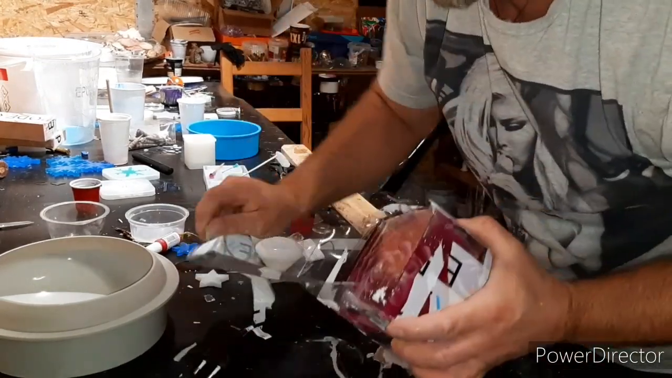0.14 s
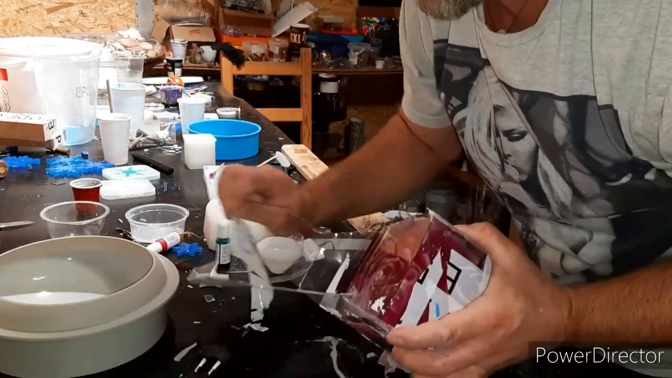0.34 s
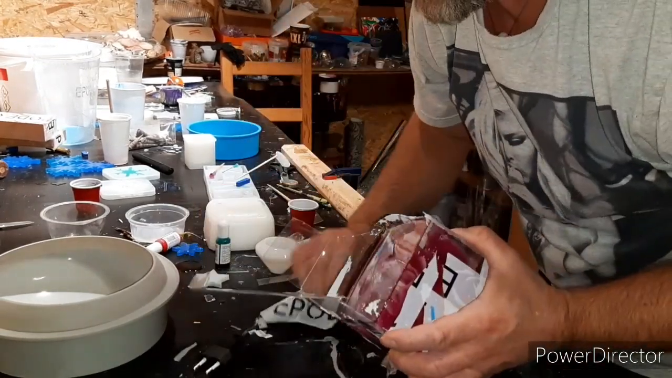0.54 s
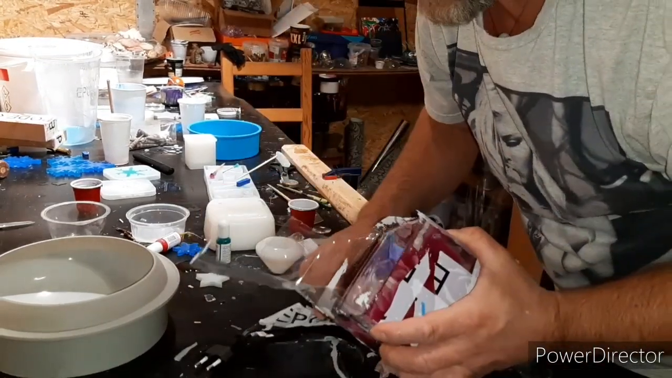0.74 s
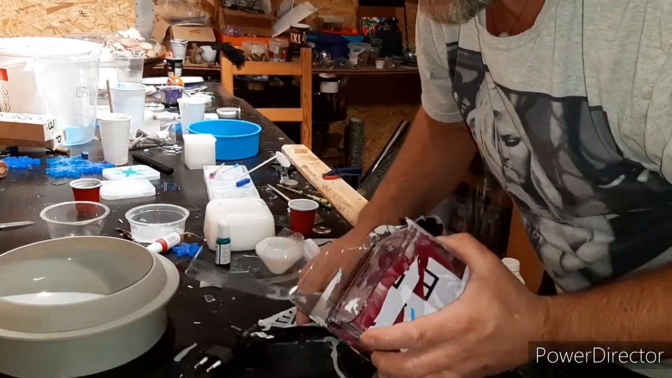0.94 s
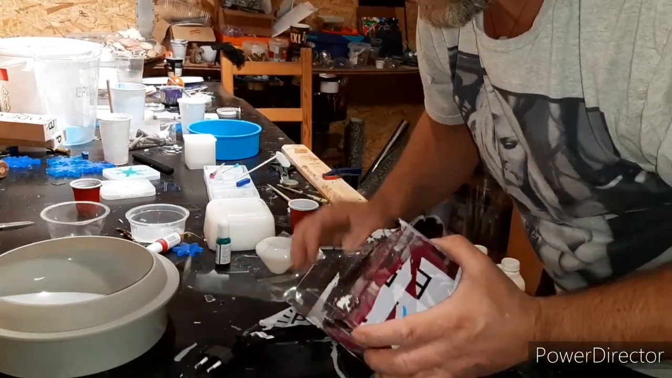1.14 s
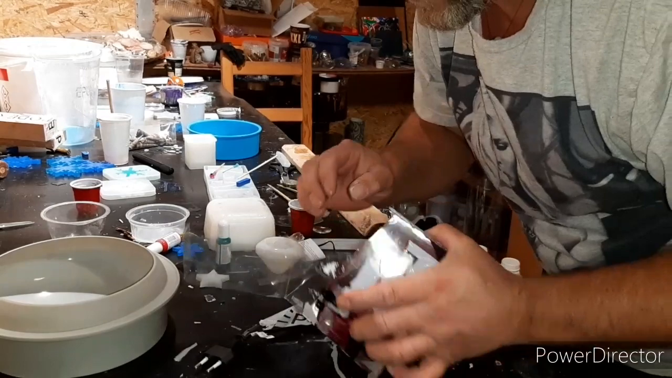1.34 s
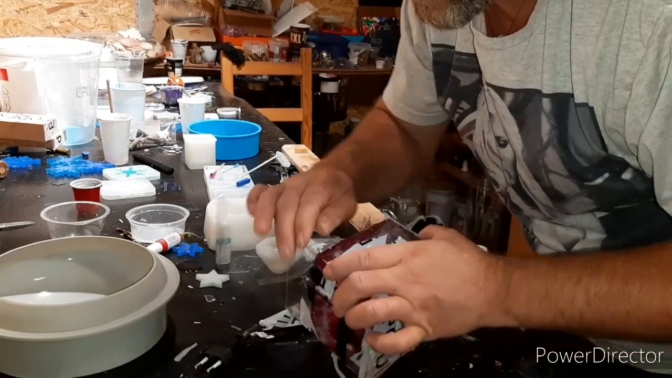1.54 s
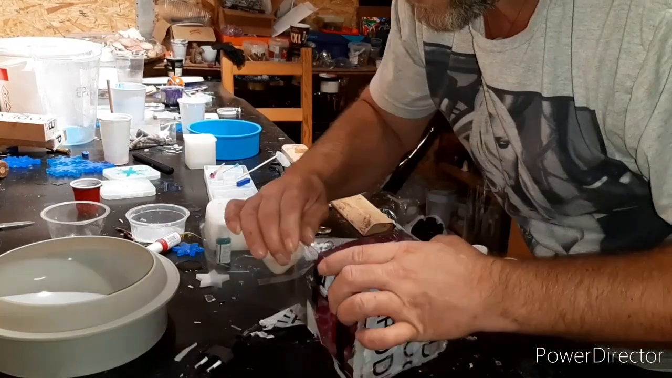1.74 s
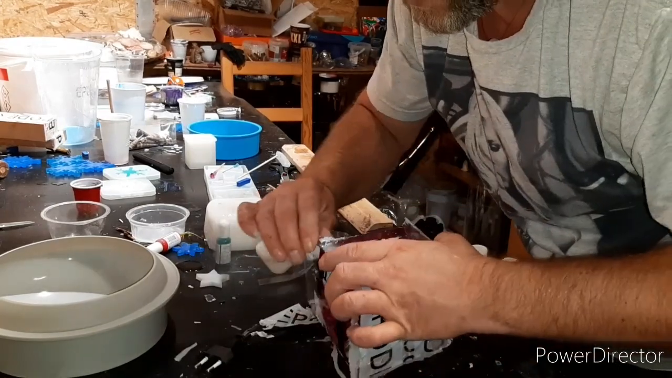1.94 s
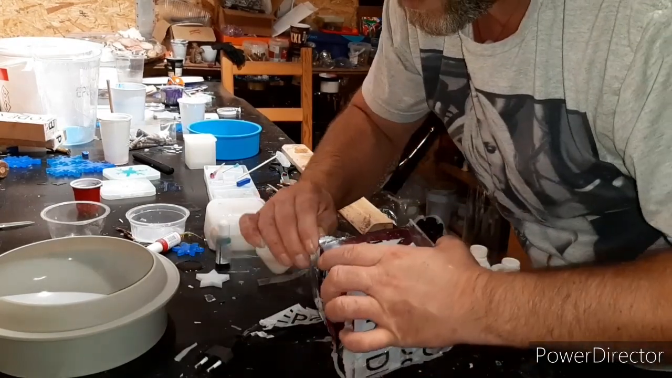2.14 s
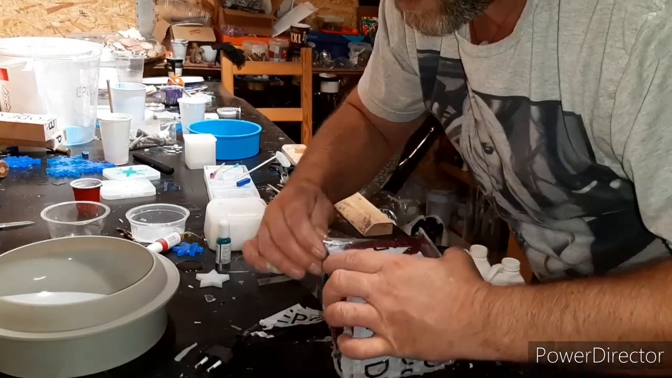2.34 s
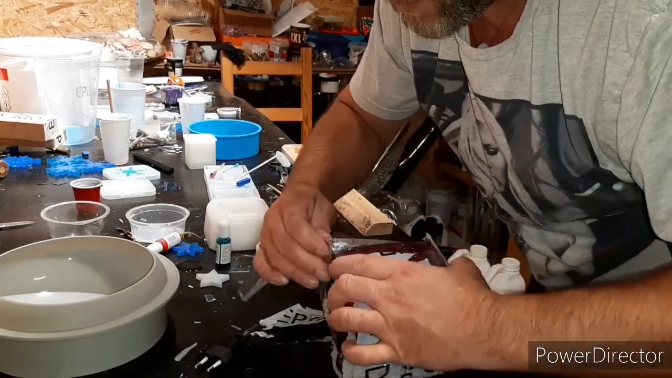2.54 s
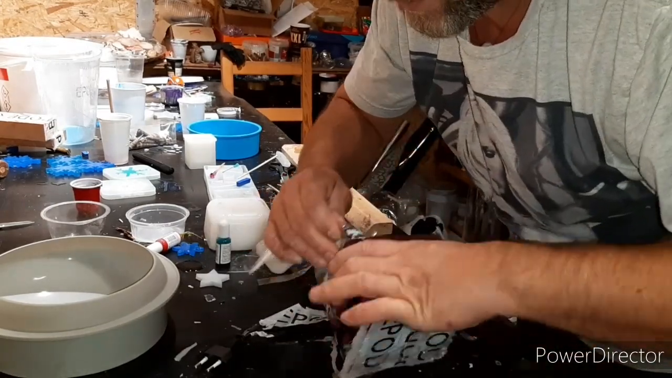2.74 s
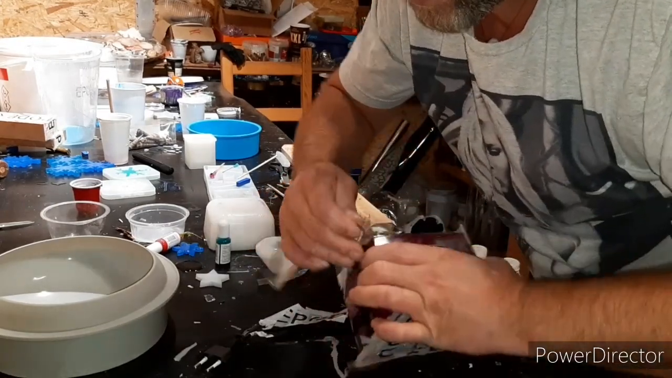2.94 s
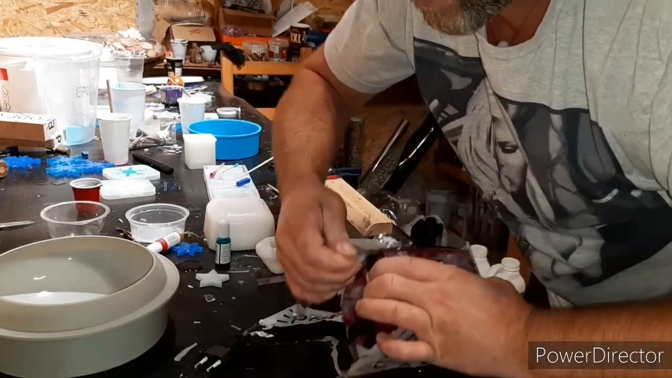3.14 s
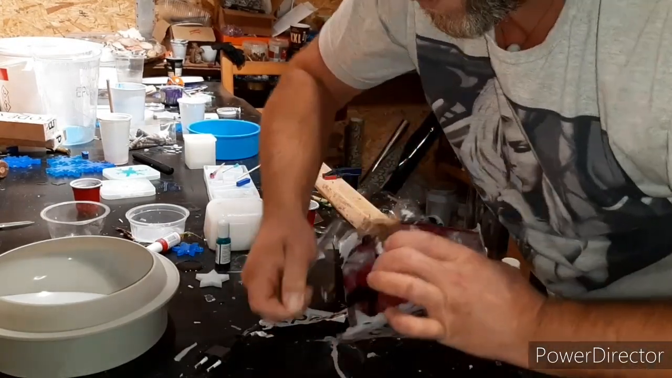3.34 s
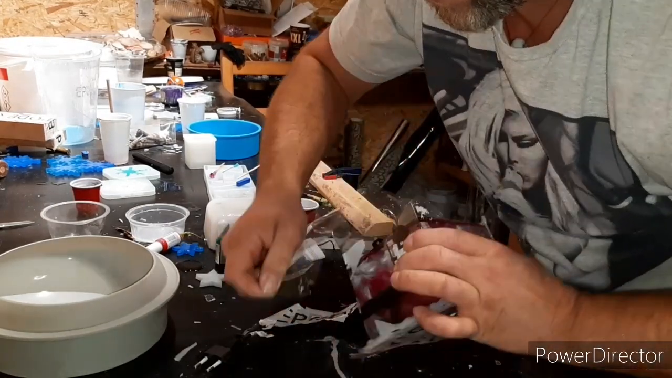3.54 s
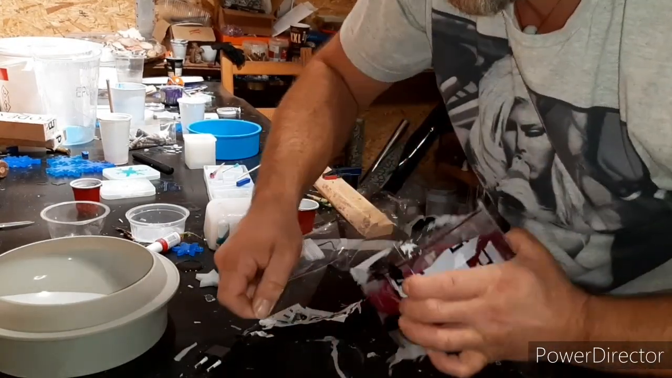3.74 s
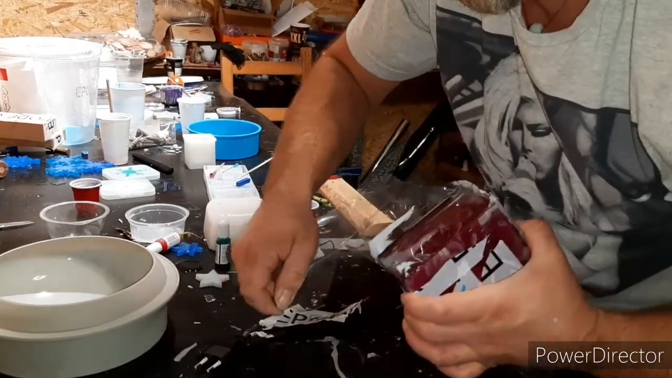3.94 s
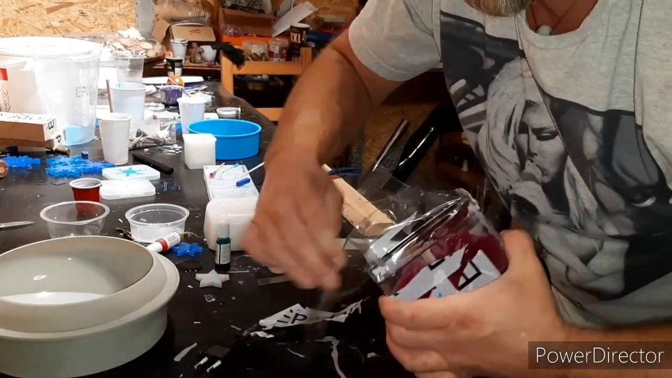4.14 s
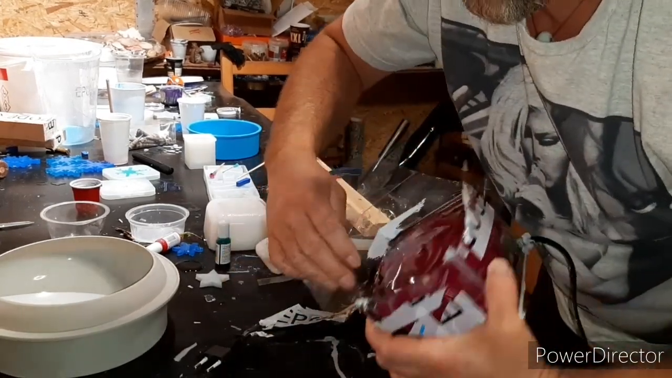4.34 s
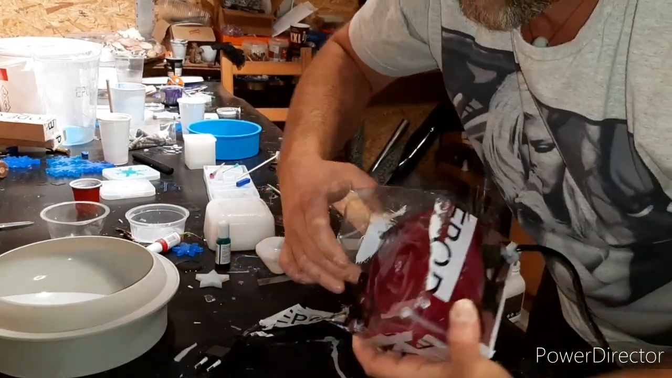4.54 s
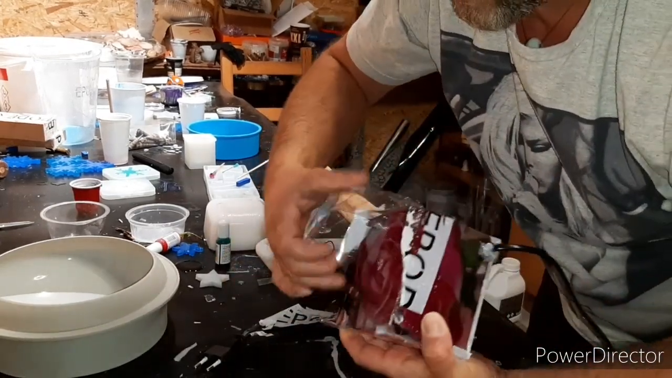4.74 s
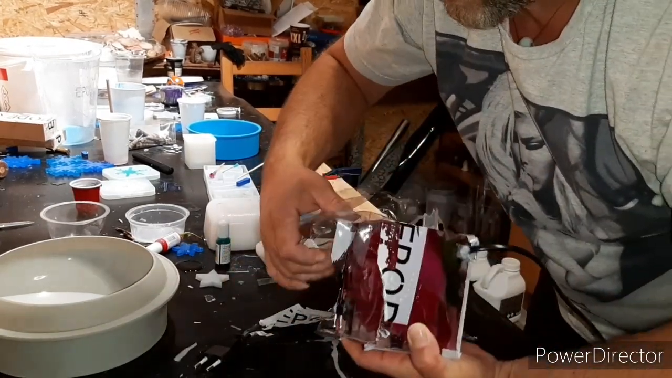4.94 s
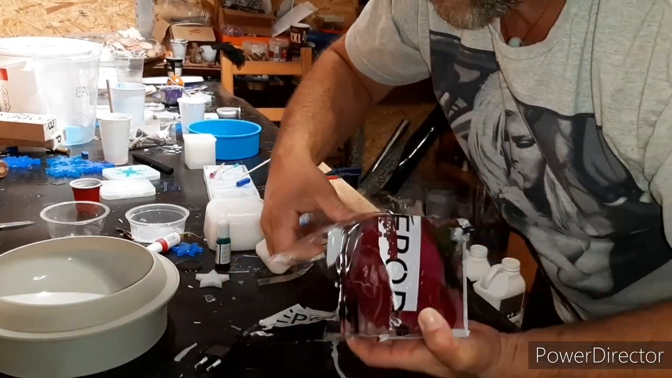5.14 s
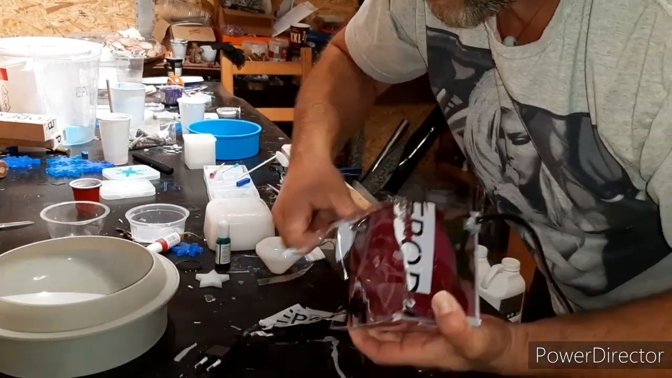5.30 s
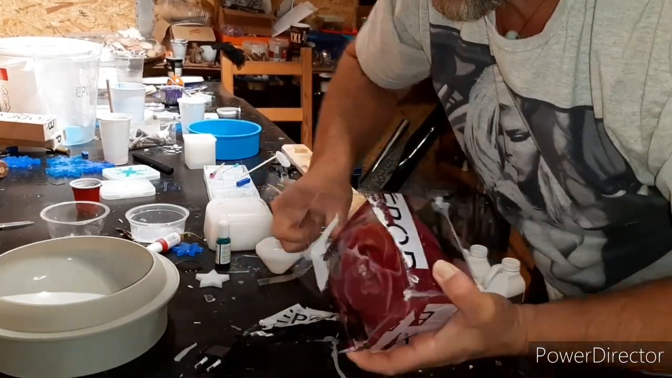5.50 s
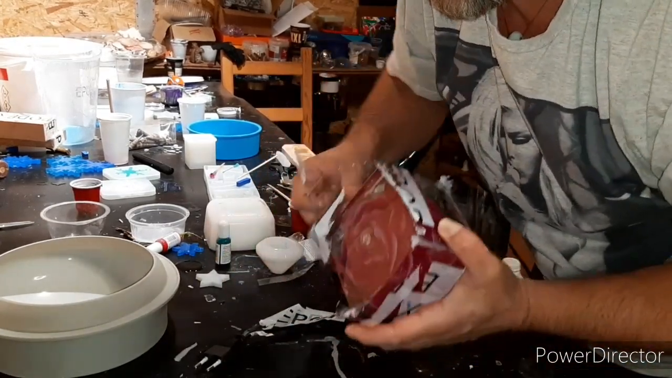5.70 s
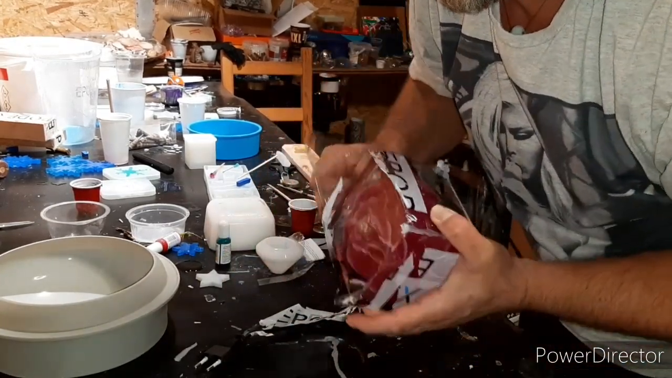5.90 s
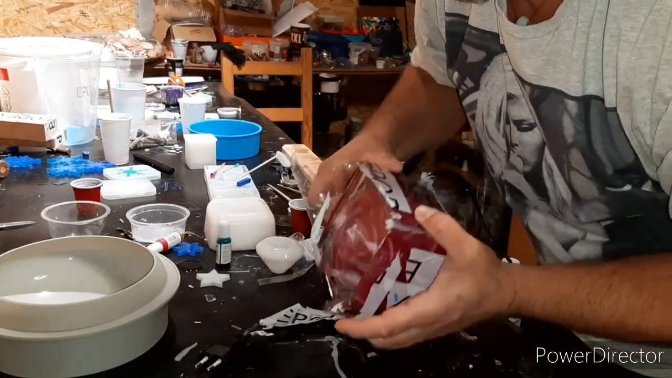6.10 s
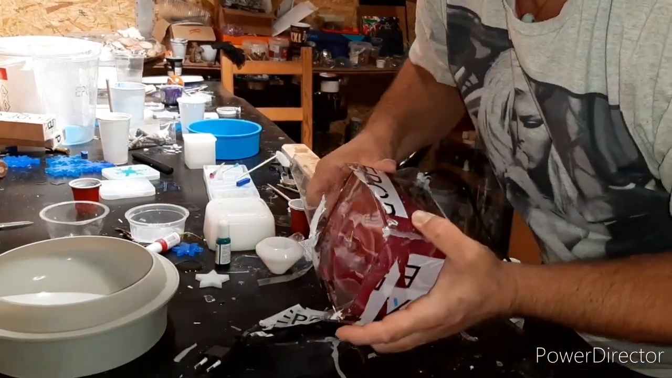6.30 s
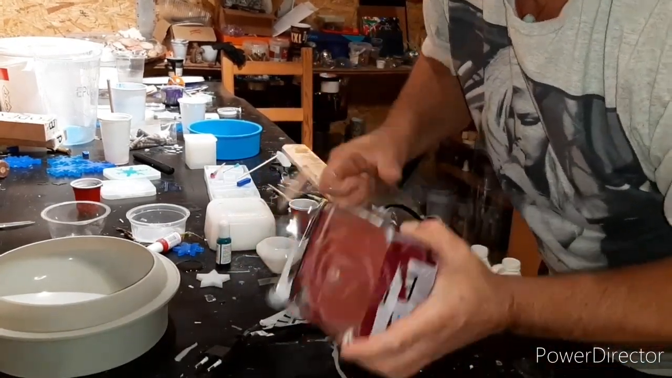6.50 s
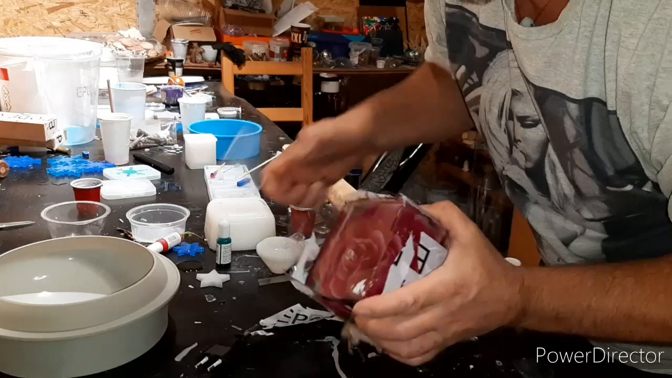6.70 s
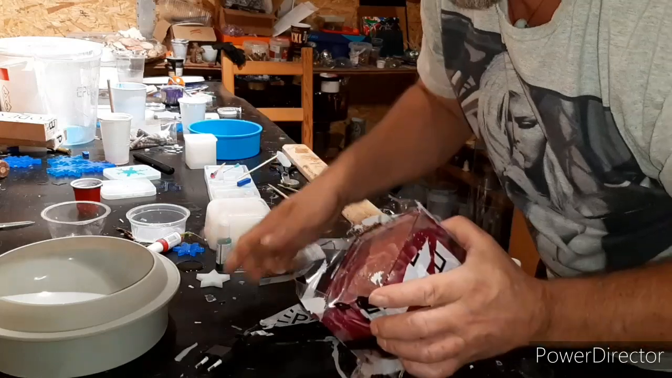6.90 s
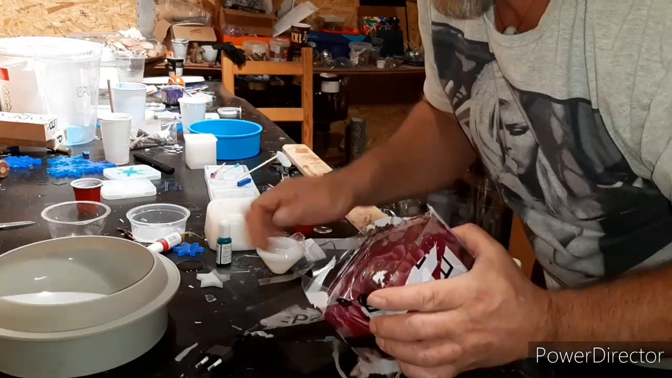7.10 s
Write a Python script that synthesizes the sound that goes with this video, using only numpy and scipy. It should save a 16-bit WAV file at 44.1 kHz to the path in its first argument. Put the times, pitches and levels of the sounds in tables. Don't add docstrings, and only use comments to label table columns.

```python
import sys
import numpy as np
from scipy import signal
from scipy.io import wavfile
from scipy.ndimage import uniform_filter1d

SR = 44100
rng = np.random.default_rng(int(sys.argv[2]) if len(sys.argv) > 2 else 0)


def gain_from_decibels(decibels):
    exponent = np.asarray(decibels, float) / 20
    return 10 ** exponent


def store_wav(level_fs):
    pcm = np.round(np.clip(np.atleast_2d(level_fs), -1, 1) * 32767)
    wavfile.write(sys.argv[1], SR, pcm.T.astype(np.int16))


N = 315753


def at_hz(points, hz, column=1):
    points = np.array(points)
    return np.interp(np.log(hz), np.log(points[:, 0]), points[:, column])


def in_time(points):
    times, levels = np.transpose(points)
    level_db = np.interp(np.arange(N) / SR, times, levels, left=-200, right=-200)
    return uniform_filter1d(gain_from_decibels(level_db), size=24)


RISE_SHARE = 0.28


def swells(rows, longest_s):
    t, gain = np.arange(0, N + 64, 64) / SR, 0
    for s, db, fall_s in rows:
        from_peak_s = np.where(t < s, (s - t) / RISE_SHARE, t - s)
        away = from_peak_s / np.clip(fall_s, .01, longest_s)
        gain = gain + gain_from_decibels(db - 20 * away ** 1.5)
    return np.interp(np.arange(N) / SR, t, gain)


def rms_one(x):
    return x / np.sqrt(np.mean(x ** 2) + 1e-20)


def add(out, s, sound):
    i = round(s * SR)
    out[i:i + len(sound)] += sound[:N - i]


def filtered(x, order, hz, kind):
    return signal.sosfilt(signal.butter(order, hz, kind, fs=SR, output="sos"), x)


# (frequency [Hz], likeness [0-1])
LIKENESS = [(60, 1), (250, 0.22), (640, 0.66), (1400, 0.044), (3000, 1), (7000, 0.041)]


def stereo_bands(size, gain, part=slice(None)):
    out, edges = 0, 30 * 2 ** np.arange(0, 9.6, .5)[part]
    white = rng.standard_normal((2, 2, size))
    for k, (low, high) in enumerate(zip(edges, edges[1:])):
        hz = np.sqrt(low * high)
        mid, side = filtered(white[k % 2], 2, [low, high], "band")
        alike = at_hz(LIKENESS, hz)
        pair = np.sqrt(1 + alike) * mid + np.sqrt(1 - alike) * side * [[1], [-1]]
        out = out + gain(hz) * pair
    return out


# (frequency [Hz], level [dB per Hz])
RUMBLE_COLOUR = [(30, -6), (60, -3.5), (120, -4.5), (240, -14)]


def low_rumble():
    noise = stereo_bands(N, lambda hz: gain_from_decibels(at_hz(RUMBLE_COLOUR, hz)), slice(0, 5))
    return gain_from_decibels(-90.5) * rms_one(noise)


# (time [s], level [dB])
HISS_LEVEL = [(0, -82), (.55, -81), (.7, -77), (3.6, -77), (3.72, -90), (3.8, -78), (6.75, -79), (6.9, -92),
              (7.09, -92), (7.12, -82), (7.16, -82)]
# (frequency [Hz], level [dB per Hz])
HISS_COLOUR = [(300, 0), (2000, -6), (4000, -4), (10000, -9), (14000, -11), (18000, -24)]


def hiss():
    noise = stereo_bands(N, lambda hz: gain_from_decibels(at_hz(HISS_COLOUR, hz)), slice(8, None))
    return in_time(HISS_LEVEL) * rms_one(noise)


# (frequency [Hz], decay t60 [s], level [dB])
ROOM = [(125, 0.072, -18), (378, 0.22, -13.5), (1000, 0.14, -11), (2350, 0.21, -14), (5800, 0.22, -12),
        (9100, .21, -15), (13000, .2, -16), (18000, .1, -28)]
PLACES, MOVE_S = 4, .11
EARLY_DB, EARLY_S = -1, 0.019


def workshop(x):
    t, out = np.arange(SR // 2) / SR, 0
    place = (np.arange(N) / (MOVE_S * SR)).astype(int) % PLACES
    onset = np.clip(t / .005 - .5, 0, 1)
    early = 1 + gain_from_decibels(EARLY_DB) * np.exp(-t / EARLY_S)
    for k in range(PLACES):
        tail = stereo_bands(len(t), lambda hz: gain_from_decibels(at_hz(ROOM, hz, column=2) - 60 * t / at_hz(ROOM, hz)))
        tail = tail * onset * early * gain_from_decibels(np.array([[-21], [-22]]))
        out = out + signal.oaconvolve((x * (place == k))[None], tail, axes=1)[:, :N]
    return out


# (left delay [s], left level [dB], right delay [s], right level [dB])
BENCH_ECHOES = [(.0007, -21.5, 0.001, -10.5), (.0019, -13, 0.002, -14)]


def near_echoes(direct):
    out = direct.copy()
    for left_s, left_db, right_s, right_db in BENCH_ECHOES:
        out[0] += gain_from_decibels(left_db) * np.roll(direct[0], round(left_s * SR))
        out[1] -= gain_from_decibels(right_db) * np.roll(direct[1], round(right_s * SR))
    return out


# (time [s], level [dB])
DRAG = [(0.0, -90.5), (1.39, -75), (2.07, -69.5), (2.81, -78), (3.03, -68.5), (3.33, -89), (3.61, -86.5),
        (3.81, -96), (4.23, -73.5), (4.69, -69.5), (5.24, -84), (5.46, -70.5), (5.7, -59.5), (5.9, -83),
        (6.14, -87), (6.62, -71), (6.9, -88.5), (7.16, -90.5)]
# (frequency [Hz], level [dB per Hz])
RUB_COLOUR = [(21, -47), (35, -43.5), (91, -14.5), (124, -3.5), (280, -7), (360, -42), (620, -120)]


def bench_rub():
    lumps = gain_from_decibels(1.5 * rms_one(uniform_filter1d(rng.standard_normal(N), size=900)))
    noise = stereo_bands(N, lambda hz: gain_from_decibels(at_hz(RUB_COLOUR, hz)), slice(0, 8))
    return in_time(DRAG) * rms_one(lumps * noise)


# (time [s], peak level [dB], frequency [Hz])
BUMPS = [(0.36, -67, 130), (0.457, -63, 130), (0.455, -50, 310), (0.369, -52, 380), (4.19, -46, 290),
         (3.56, -65, 160), (6.78, -52, 133), (7.121, -60.5, 430), (0.719, -50, 206), (1.083, -38, 130),
         (1.154, -33.5, 225), (1.156, -40, 114), (1.289, -56, 116), (1.625, -55, 86), (1.86, -48, 123),
         (2.156, -53, 120), (2.1, -42.5, 190), (2.42, -54, 200), (1.8, -35, 286), (1.62, -50, 240),
         (2.059, -30.5, 250), (2.064, -35, 125), (2.082, -37.5, 147), (2.17, -57, 120), (2.09, -42, 410),
         (2.4, -43, 360), (4.06, -73, 111), (6.84, -65.5, 130), (2.356, -51, 116), (2.479, -43.5, 160),
         (2.878, -40.5, 210), (3.044, -31, 214), (3.127, -47, 210), (4.181, -69, 248), (4.384, -30.5, 294),
         (4.831, -37, 245), (5.263, -47, 100.6), (5.478, -39, 210), (5.645, -41, 180), (5.72, -55, 150),
         (6.239, -44, 147), (6.548, -28.5, 253), (6.741, -34, 260)]
# (time [s], frequency [Hz], level [dB], decay t60 [s])
FLAPS = [
    (1.728, 414.4, -32, 0.15),
    (5.732, 203, -41, 0.36),
]


def bumps(cycles=11.0, rise_s=0.007):
    out, t = np.zeros(N), np.arange(SR // 2) / SR
    soft = 1 - np.exp(-t / rise_s)
    pushes = [(s, hz, db, cycles / hz) for s, db, hz in BUMPS]
    for s, hz, db, t60 in pushes + FLAPS:
        add(out, s, gain_from_decibels(db - 60 * t / t60) * soft * np.sin(2 * np.pi * hz * t))
    return filtered(out, 2, 70, "high")


# (time [s], level [dB], frequency [Hz])
PUFFS = [
    (3.349, -18.5, 118),
    (6.446, -15.5, 106.9),
]


def puffs(turns=1.1):
    out = np.zeros(N)
    for s, db, hz in PUFFS:
        phase = np.arange(round(turns * SR / hz)) * hz / SR
        swell = np.sin(np.pi * phase / turns)
        add(out, s, gain_from_decibels(db) * swell * np.cos(2 * np.pi * (phase - turns * 1.3)))
    return out


# (frequency [Hz], level [dB])
SHEET = [(250, -16.5), (400, -1), (650, 5), (1100, -3.5), (1800, 4), (3500, -2.5), (8000, -14),
         (15000, -5.5)]


def crackle(low_hz, high_hz, per_s, uneven_db, cycles, count=12):
    clump = gain_from_decibels(uneven_db * rms_one(uniform_filter1d(rng.standard_normal(N), size=180)))
    sizes = gain_from_decibels(uneven_db * np.minimum(rng.exponential(1, N), 4)) * rng.choice([-1, 1], N)
    clicks = sizes * (rng.random(N) < per_s * clump / SR)
    dealt, out = rng.integers(0, count, N), 0
    for k, hz in enumerate(np.geomspace(low_hz, high_hz, count)):
        r, w = gain_from_decibels(-60 * hz / (cycles * SR)), 2 * np.pi * hz / SR
        struck = clicks * (dealt == k) + 1e-18
        ringing = signal.lfilter([0, np.sin(w)], [1, -2 * r * np.cos(w), r * r], struck)
        out = out + gain_from_decibels(at_hz(SHEET, hz)) * np.sqrt(hz) * ringing
    return rms_one(out)


def split(x):
    return [rms_one(filtered(x, 8, 7700, kind)) for kind in ("low", "high")]


# (time of most stir [s], middle level [dB], edge over it [dB], 20 dB fall [s])
STIRS = [(.35, -72.5, 2.5, 0.43), (0.649, -69.5, 11.5, 0.11), (0.751, -89.5, 22.5, -0.19),
         (1.13, -70.5, 7.5, -0.08), (1.19, -63, 9, .06), (1.76, -62, 14, .1), (1.94, -57.5, -21.5, 0.32),
         (2.07, -62, -3, .07), (2.28, -62, -6, .06), (2.5, -59, 3, .2), (2.87, -56, -4, .15),
         (3.01, -50, -9, .14), (3.272, -56, -7.5, -0.34), (3.57, -54, 6, .07), (3.85, -75, 1, -0.7),
         (4.09, -59, 1.5, .15), (4.3, -53, 0.2, .1), (4.44, -51, -3, -0.06), (4.03, -55, 3, .08),
         (4.53, -60, 0, .12), (4.7, -58, 2, .1), (4.809, -43.5, -6.5, 0.24), (4.961, -74.5, 15.5, 0.38),
         (5.029, -60, -4.7, 0.04), (5.31, -34, -14, 0.0565), (5.621, -57, 12.5, 0.39),
         (5.68, -49.5, -2, 0.1), (6.11, -57, 7, .12), (6.18, -48, 5, 0.12), (6.41, -75, 8, 0.46),
         (6.611, -47, -17, 0.15), (6.72, -65.5, 18, 0.08), (7.15, -84.5, 28.5, 0.1)]


def rustle():
    middle = crackle(1000, 6600, per_s=6000, uneven_db=4.5, cycles=16.0)
    edge, top = split(crackle(3500, 13000, per_s=6000, uneven_db=4.5, cycles=16.0))
    bright = edge + gain_from_decibels(-8.5) * top
    middle_gain = swells([(s, db, fall_s) for s, db, _, fall_s in STIRS], longest_s=.2)
    bright_gain = swells([(s, db + edge_db, fall_s) for s, db, edge_db, fall_s in STIRS], longest_s=.2)
    return gain_from_decibels(-8) * (middle_gain * middle + bright_gain * bright)


# (time of most strain [s], level [dB], 20 dB fall [s])
SQUEEZES = [(.05, -100, 1), (.62, -83, 1), (1.5, -77, 0.1), (1.8, -64, 0.42), (1.97, -64, -2.03),
            (2.1, -86, 2.4), (2.28, -71, -1.44), (2.93, -64, 0.6), (2.47, -62.5, 0.34), (2.83, -64, -0.9),
            (3.02, -53.5, 0.1), (3.12, -60, -0.9), (3.2, -51, 0.35), (3.39, -63.5, 0.5), (4.215, -58, 0.16),
            (4.3, -54, 0), (4.52, -83, 0), (4.85, -70, 0.73), (5.35, -60.5, 2.7), (5.68, -63.5, 0.21),
            (6.16, -82, 0.5), (6.46, -44, 0.02), (6.7, -60.5, 0.18)]


def creak():
    return gain_from_decibels(-3) * swells(SQUEEZES, .5) * crackle(240, 1300, per_s=1200, uneven_db=3.8, cycles=11.0)


RIP_ATTACK_S, RIP_SAG_DB, RIP_RELEASE_DB_PER_S = 0.001, 7, 328.5


def rip_outline(start_s, length_s, db):
    full_s = start_s + RIP_ATTACK_S
    end_s, end_db = full_s + length_s, db - RIP_SAG_DB
    return [(start_s, db - 20), (full_s, db), (end_s, end_db),
            (end_s + .2, end_db - .2 * RIP_RELEASE_DB_PER_S)]


# (start [s], length [s], body level [dB], middle level [dB], edge level [dB], top level [dB])
RIPS = [(0.705, 0.11, -70, -61.5, -49, -53), (2.381, 0.12, -55, -71, -82, -90),
        (2.776, 0.036, -51.5, -58, -69.5, -73), (3.123, 0.048, -40, -56.5, -50.5, -58.5),
        (3.3498, 0.051, -38, -21, -20, -20.5), (5.7237, 0.0034, -63.5, -34.5, -22, -54.5),
        (1.711, 0.011, -65, -53, -41, -41), (4.275, 0.02, -52, -43.5, -48.5, -48.5),
        (5.252, .012, -38, -35, -43, -64), (5.489, 0.01, -43.5, -21, -25.5, -41),
        (5.645, 0.0078, -38.5, -32, -31.5, -43), (3.555, 0.019, -79, -60, -50, -44.5),
        (3.99, .02, -58, -45.5, -48.5, -80), (5.883, 0.0053, -63, -41.5, -45.5, -48),
        (6.154, .012, -65.5, -57, -60, -58), (2.054, 0.031, -52.5, -62, -67, -85),
        (4.643, 0.013, -62, -48, -49, -47), (6.243, 0.018, -49.5, -44, -45.5, -55),
        (1.096, 0.036, -64, -59, -55.5, -63), (6.165, .02, -51, -45.5, -43.5, -46.5),
        (6.4463, 0.049, -53, -30, -15.5, -18)]


def rips():
    body, middle, bright = [crackle(low, high, per_s=5000, uneven_db=3.5, cycles=12.0)
                            for low, high in [(260, 1000), (1000, 4500), (3500, 14000)]]
    out = np.zeros(N)
    for k, band in enumerate([body, middle, *split(bright)]):
        gain = sum(in_time(rip_outline(s, length_s, dbs[k])) for s, length_s, *dbs in RIPS)
        out += gain_from_decibels(-3) * gain * band
    return out


def scattered(x):
    for lag in (23, 41, 67):
        taps = np.r_[1, np.zeros(lag - 1), -.6]
        x = signal.lfilter(taps[::-1], taps, x)
    return x


# (time [s], peak level [dB], frequency [Hz])
SPIKES = [(3.3504, -5, 2990), (3.3678, -8, 3530), (3.3688, -12, 3550), (3.3711, -7, 2500),
          (3.379, -13, 2500), (3.3854, -10.5, 4000), (3.3887, -9, 3920), (3.3975, -14, 2210),
          (3.55, -30, 5030), (3.565, -38, 4090), (4.6118, -36.5, 6070), (4.8385, -20, 4950),
          (5.2625, -6, 3990), (5.4535, -28.5, 3020), (5.4891, -13, 6000), (5.4958, -4, 2240),
          (5.4988, -6, 2500), (5.5985, -32.5, 7270), (5.727, -12.5, 4450), (6.09, -36, 3500),
          (6.125, -43.5, 4500), (6.2175, -31.5, 7000), (5.7222, -13, 2300), (2.9135, -38, 5070),
          (6.4481, -12, 4550), (6.466, -5, 4170), (6.4752, -11, 4040), (6.4863, -9, 3000),
          (6.4902, -9.5, 3026), (6.4971, -9, 3500), (6.667, -36, 4060), (6.687, -31, 7050),
          (6.726, -49, 4000), (6.752, -53, 5500)]


def spikes(cycles=7.5):
    out, t = np.zeros(N), np.arange(200) / SR
    for k, (s, db, hz) in enumerate(SPIKES):
        pulse = gain_from_decibels(db - 60 * t * hz / cycles) * np.sin(2 * np.pi * hz * t)
        add(out, s, (-1) ** k * filtered(pulse, 3, [hz / 6, 1.8 * hz], "band"))
    return out


CRACK_S, FOLD_S, TICK_S = .0024, .0036, .0014

# (time [s], peak level at 3-7 kHz [dB], ring over it [dB], top over it [dB])
TICKS = [(0.156, -55.5, -10.5, -6), (0.303, -52.5, -11, 1), (0.3673, -50, -14, 2), (0.6354, -45, -16, 1),
         (0.689, -31.5, -35, 0), (0.7556, -33, -18, -4), (0.8077, -28.5, -17, 0), (0.921, -50, -40, 4),
         (1.076, -42, -12, -7), (1.6321, -42, -8, -10), (2.61, -58, -10, -22), (2.648, -50, -7, -26),
         (2.6946, -49, -30, -22), (3.028, -49, -8, -1), (3.5743, -28.5, -12, -2), (3.837, -36.5, -14, 2),
         (4.098, -56, -14, 8), (4.1139, -37, -2.5, -5), (4.219, -66, 0, -15), (4.435, -56, -10, -1),
         (5.0064, -44.5, -2, 0), (4.2526, -42, -5, -11), (4.4517, -47.5, -3, -11),
         (4.6132, -40.5, -5.5, -2), (5.5987, -23.5, -12, -7), (6.0603, -33, -6.5, -11.5),
         (6.401, -36.5, -11, -2), (6.6356, -33.5, -21, -25), (6.6664, -35, -15, -11),
         (6.6869, -36.5, -6, 5), (7.119, -45.5, -6, -21)]


def ticks():
    return [(s, TICK_S, db + ring, 1830, db + ring - 11.5, db, db + top) for s, db, ring, top in TICKS]


# (time [s], peak level at 1-3 kHz [dB], main ring [Hz], body over it [dB])
KNOCKS = [(2.355, -75, 1020, 21), (2.3847, -69, 1020, 15), (2.4808, -46, 1050, 1.5),
          (2.7667, -49.5, 1680, 8.5), (2.955, -53, 1020, -13), (2.9748, -49, 1000, 8),
          (3.045, -33, 1110, 1.5), (3.0929, -29.5, 1300, -8.5), (3.1501, -33, 1020, -0.5),
          (3.636, -47.5, 2070, -9), (3.8965, -30, 1675, -6.5), (4.1904, -46, 1420, 10),
          (4.3883, -34, 1360, -5), (4.6753, -32, 1390, -16), (5.6793, -28, 1380, -1),
          (6.696, -33, 2300, -15.5), (6.7279, -35.5, 2070, -7), (6.8557, -52, 2340, -4.5)]


def knocks():
    return [(s, CRACK_S, db, hz, db + body, db - 15.5, db - 31.5) for s, db, hz, body in KNOCKS]


# (time [s], peak level [dB], ring [Hz])
BUCKLES = [(1.693, -48, 2640), (1.718, -33, 1370), (1.730, -24, 1220), (4.071, -42, 1100),
           (4.644, -33, 1650), (4.830, -36, 1300), (5.2555, -25, 2300), (5.4945, -9, 1450),
           (5.632, -36, 1680), (5.7285, -11, 1790), (6.160, -31, 1800)]
BUCKLE_BANDS_DB = -10, -14, -32


def buckles():
    return [(s, CRACK_S, db, hz, *np.add(db, BUCKLE_BANDS_DB)) for s, db, hz in BUCKLES]


# (time [s], peak level at 1-3 kHz [dB], main ring [Hz], body over it [dB], edge over it [dB])
FOLDS = [(0.5898, -56.5, 1410, -5, 3.5), (0.729, -39.5, 1800, -1, -16), (1.0867, -43, 980, -1.5, -0.5),
         (1.099, -45.5, 2700, -1, -9), (1.154, -40, 1920, -1, -6.5), (1.972, -47, 1350, -9, -5.5),
         (2.059, -50, 1380, 2, -4), (2.8655, -44, 1300, 1.5, 2.5), (2.9127, -39, 1380, -1, 0),
         (3.081, -38, 1313, -24, -10.5), (3.262, -51.5, 1020, -7.5, -0.5), (3.7742, -37, 3040, -11, -5.5),
         (3.9948, -15, 1590, -25, -9.5), (4.0799, -37, 1840, -9, 0), (4.4195, -44.5, 1400, -3, 0.5),
         (4.493, -51, 1420, 1, 3), (4.7829, -38.5, 1830, -1.5, -1.5), (5.6472, -19, 2170, -17.5, -1.5),
         (5.7223, -8.5, 2436, -30, -0.5), (6.0829, -38, 1760, -11, 5.5), (6.169, -23.5, 1717, -31, -1),
         (6.4858, -8.5, 2850, -22.5, 0), (6.491, -10, 2300, -24.5, 2), (6.497, -15.5, 1582, -19, 1),
         (6.466, -19, 1592, -19, 7), (6.5472, -25.5, 2520, -6, 3.5), (6.7493, -48, 2250, 4, -24)]
FOLD_DULLING, SOFT_FOLD_DB = 0.42, -45


def folds():
    rows = []
    for s, db, hz, body, edge in FOLDS:
        top_db = db + edge - 7.5 - FOLD_DULLING * (db - SOFT_FOLD_DB)
        rows.append((s, FOLD_S, db, hz, db + body, db + edge, top_db))
    return rows


# (time [s], peak level at 1-3 kHz [dB], main ring [Hz], body over it [dB], edge over it [dB])
CRACKS = [(1.723, -21, 1210, -26, -4), (1.725, -21.5, 1980, -19, -4.5), (3.41, -18, 1920, -21.5, -4.5),
          (3.452, -27, 2840, -11.5, 5.5), (3.1278, -27.5, 1570, -16.5, 0), (3.3177, -17, 1200, -14.5, -4),
          (3.3507, -9.5, 1740, -21, -1), (3.366, -10, 1780, -13.5, -11), (3.386, -8.5, 1876, -25.5, 3.5),
          (3.5502, -33, 1810, -9.5, 6), (4.2822, -33, 1917, -8, -0.5), (4.65, -23.5, 1624, -41, -3),
          (4.8392, -32.5, 1600, -4, 9), (4.9514, -29, 1680, -18, 2.5), (5.2624, -11.5, 1810, -9.5, 2),
          (5.4113, -30, 1650, -5, -2.5), (5.454, -31.5, 2070, -8.5, 4), (5.4886, -6, 1963, -11.5, 1),
          (5.8889, -29.5, 2317, -30, 4.5), (6.2183, -29, 2700, -20.5, 6), (6.241, -24.5, 1514, -6, -7),
          (6.4485, -15.5, 1810, -21, 3)]


def cracks():
    return [(s, CRACK_S, db, hz, db + body, db + edge, db + edge - 8.5) for s, db, hz, body, edge in CRACKS]


def resonance(x, hz, width_hz):
    r = np.exp(-np.pi * width_hz / SR)
    return rms_one(signal.lfilter([1, 0, -1], [1, -2 * r * np.cos(2 * np.pi * hz / SR), r * r], x))


def sheet_ring(burst, hz):
    ring = rms_one(resonance(burst, hz, 250) + gain_from_decibels(-3.5) * resonance(burst, hz, 77))
    return gain_from_decibels(7 - 3 * max(hz - 1800, 0) / 1000) * ring


BANDS_HZ = [270, 1000, 2900, 7800, 15500]
SNAP_SIDE_DB = [-9.5, 0.5, -4.5, -11]


def snaps(cycles=5.0, lumpy_db=3.5, rise_s=0.0003):
    out, t = np.zeros((3, N)), np.arange(1500) / SR
    bands = [signal.butter(order, edges, "band", fs=SR, output="sos")
             for order, edges in zip([4, 4, 7, 6], zip(BANDS_HZ, BANDS_HZ[1:]))]
    rise = 1 - np.exp(-t / rise_s)
    for s, slip_s, db, hz, body_db, edge_db, top_db in cracks() + folds() + knocks() + ticks() + buckles():
        lumps = gain_from_decibels(lumpy_db * np.repeat(rng.standard_normal(len(t) // 30), 30))
        slips = rise * rng.standard_normal((2, len(t))) * lumps
        for k, level_db in enumerate([body_db, db, edge_db, top_db]):
            dying = np.exp(-(t / (slip_s + cycles / BANDS_HZ[k + 1])) ** 2)
            sound, other = map(rms_one, signal.sosfilt(bands[k], slips * dying))
            ring = sheet_ring(sound, hz) if k == 1 else 0 * sound
            gain = gain_from_decibels(level_db) / np.abs(sound + ring).max()
            for row, part in zip(out, [sound, ring, gain_from_decibels(SNAP_SIDE_DB[k]) * other]):
                add(row, s - .0005, gain * part)
    return out


def scene():
    burst, ring, unlike = snaps()
    burst = burst + spikes()
    torn, low = rips(), bumps()
    grains = torn + rustle() + creak()
    unlike = unlike + gain_from_decibels(-4) * scattered(torn)
    sheet = burst + ring + grains
    left = gain_from_decibels(1.1) * (sheet + unlike)
    right = gain_from_decibels(-1.1) * np.roll(sheet - unlike, 1)
    direct = near_echoes(np.array([left, right]))
    direct += low * gain_from_decibels(np.array([[1.5], [-2.5]]))
    direct[0] += puffs()
    room = workshop(burst + gain_from_decibels(-2.5) * ring + grains + low)
    background = bench_rub() + low_rumble() + hiss()
    return direct + room + background * gain_from_decibels(np.array([[1.5], [-1.5]]))


def top_cut(x):
    return signal.sosfilt(signal.butter(12, 16510, fs=SR, output="sos"), x)


def record(dry):
    dull = signal.sosfilt(signal.cheby2(10, 45, 15900, fs=SR, output="sos"), dry)
    rounded = 0.96 * np.tanh(dull / 0.85)
    mix = filtered(rounded, 2, 50.7, "high")
    return top_cut(mix)


dry = scene()
out = record(dry)
store_wav(out)
```